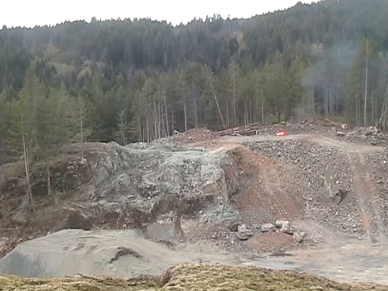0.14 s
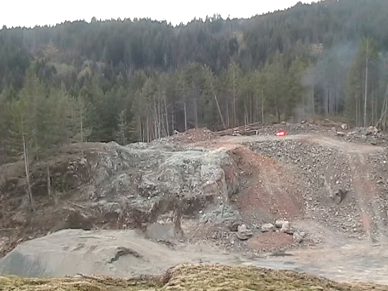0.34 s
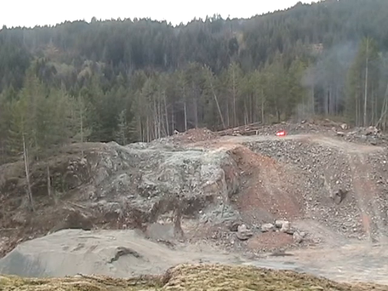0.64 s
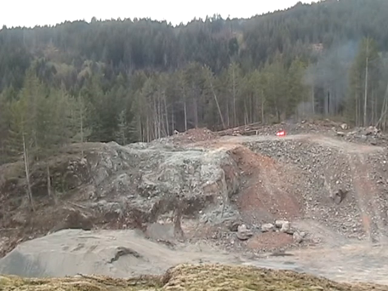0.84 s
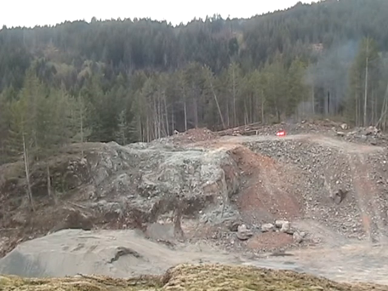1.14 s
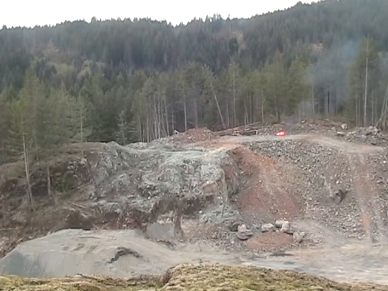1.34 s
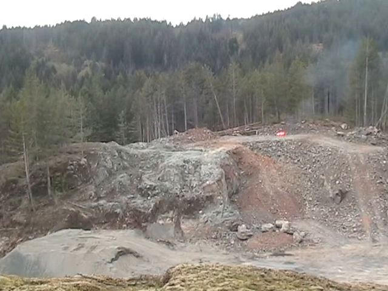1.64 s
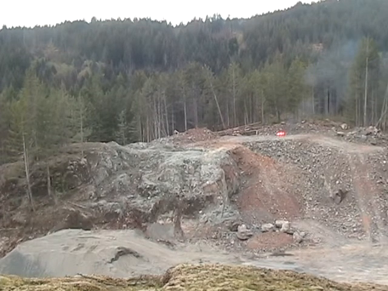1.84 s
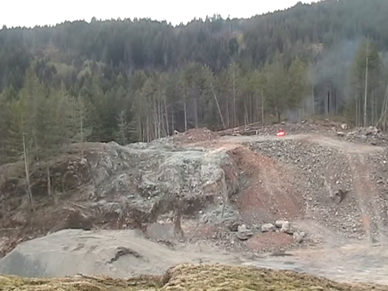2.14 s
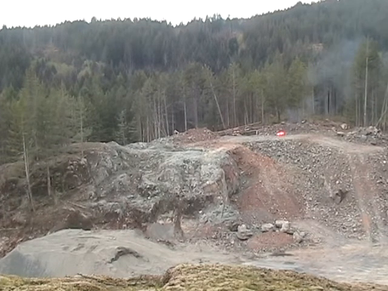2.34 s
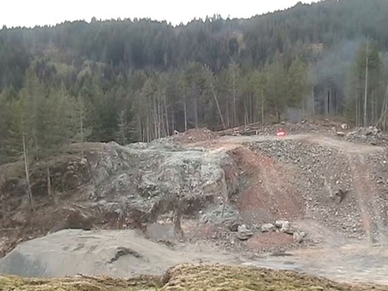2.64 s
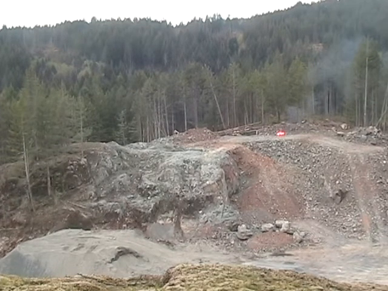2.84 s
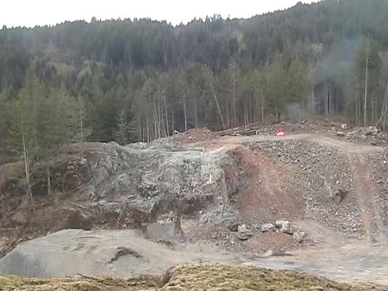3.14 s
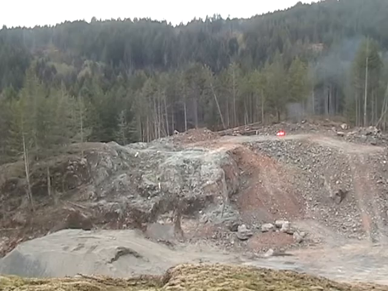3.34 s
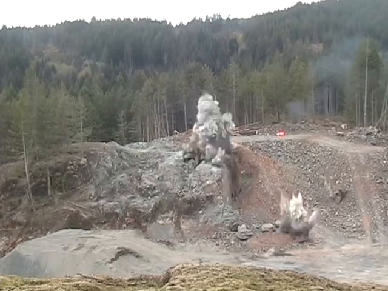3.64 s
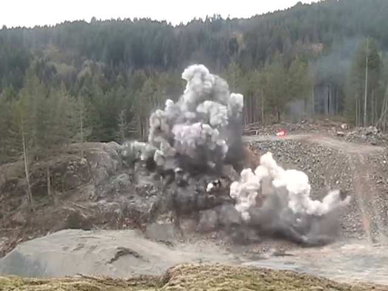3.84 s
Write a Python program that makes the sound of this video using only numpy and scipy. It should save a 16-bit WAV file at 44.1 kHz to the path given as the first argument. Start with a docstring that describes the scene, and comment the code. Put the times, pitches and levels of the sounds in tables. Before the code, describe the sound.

A quarry blast breaks a quiet outdoor scene. From 0 to 3.28 s there is soft air and hiss, faint camcorder motor whine, a far engine's low wavering drone and a thin high whistle coming and going until about 2.95 s. Tiny snaps lead into deep, clipped thuds at 3.29 s; dense sharp charges crackle from 3.4 s, with choking pressure surges from 3.9 s, cutting off at 4 s.

```python
"""A few deep thuds overload the recorder, sharp charges crackle on and slow pressure surges follow: a quarry
face blasted across a wooded valley. Underneath, a far engine drones and rumbles, air and electronics hiss,
camcorder motors whine and a thin whistle comes and goes. Thuds are dying sines over filtered noise, charges are
clicks in noise bursts, surges are a slow curve into the capsule stops; the engine is a drifting sine and a
broad low noise band, the motors are spectral lines and narrower noise bands."""
import sys
import numpy as np
from scipy import signal
from scipy.fft import rfft, irfft
from scipy.io import wavfile
from scipy.ndimage import uniform_filter1d, map_coordinates

SR = 44100
rng = np.random.default_rng(int(sys.argv[2]) if len(sys.argv) > 2 else 0)


def wav_record(signal):
    """Record a signal, one row per channel, as 16-bit PCM in the file named by sys.argv[1]."""
    frames = np.transpose(np.atleast_2d(signal))
    bounded = np.clip(frames, -1, 1)
    # unit amplitude maps onto the largest positive 16-bit level
    quanta = np.round(bounded * 32767).astype(np.int16)
    wavfile.write(sys.argv[1], SR, quanta)


def nominal_scale(level):
    """Amplitude ratio for a level in decibels (scalar or array-like)."""
    x = np.asarray(level, float) / 20
    return 10 ** x


N = 176400
T = np.arange(N) / SR
CAPSULE_STOP_DB = 5

# slow pressure on the capsules: t/s, share of their stop
PRESSURE = [(3.87, 0), (3.8965, .6), (3.9, 1.4), (3.903, 1.3), (3.904, .6), (3.9455, .95), (3.957, .8),
            (3.9588, 1.4), (3.9615, 1.4), (3.9625, .7), (3.978, 1.1), (3.981, .7), (3.991, .75),
            (3.9925, 1.5), (3.9975, 1.5), (3.9985, .8)]


def read(table, hz):
    """dB of a (f/Hz, level/dB) table, interpolated on a log frequency axis."""
    rows = np.array(table, float)
    return np.interp(np.log(hz + 1), np.log(rows[:, 0]), rows[:, 1])


def colour(x, table):
    """Minimum-phase filter of unit power with the table's shape, by folding the cepstrum."""
    log_gain = read(table, np.linspace(0, SR / 2, 4097)) * np.log(10) / 20
    cepstrum = irfft(log_gain)
    cepstrum[1:4096] *= 2
    cepstrum[4097:] = 0
    h = irfft(np.exp(rfft(cepstrum)))[:4096]
    return signal.fftconvolve(x, h / np.sqrt(np.sum(h ** 2)))[:N]


def noise():
    """White noise of unit power."""
    return rng.standard_normal(N)


def clicks(times_s, sizes):
    """A train of single-sample pulses."""
    at = np.clip((np.asarray(times_s) * SR).astype(int), 0, N - 1)
    return np.bincount(at, sizes, N)


def tail(train, tau_s):
    """Envelope that jumps at each pulse and dies away; powers add."""
    power = signal.lfilter([1], [1, -np.exp(-2 / (tau_s * SR))], train ** 2)
    return np.sqrt(np.maximum(power, 0))


def rings(rows):
    """A dying sine for each row, computed over the last second only."""
    start_s, db, hz, swing, t60_s = np.array(rows).T[:, :, None]
    age_s = np.maximum(T[-SR:] - start_s, 0)
    decay = np.exp(-np.log(1000) * age_s / t60_s)
    sines = swing * nominal_scale(db) * np.sin(2 * np.pi * hz * age_s) * decay
    return np.r_[np.zeros(N - SR), sines.sum(axis=0)]


def thuds():
    """Dying low swings, with noise rumble after them and under the surges; mid and side."""
    # deep thuds: t/s, level/dB, ring f/Hz, signed first-swing factor, t60/s
    thud_rows = [(3.2872, 15.5, 268.7, -0.67, 0.059), (3.2971, 6.5, 545, 0.93, 0.035),
                 (3.3052, -1.5, 300, 1, 0.017), (3.3202, 4, 215, 1, 0.019), (3.359, 1, 295, 1, 0.0097),
                 (3.3728, 2.5, 314, -1.4, 0.028), (3.4, -1.5, 257, -1.07, 0.058),
                 (3.9323, -1, 320, 0.0047, 0.013), (3.9711, -5.5, 300, 0.67, 0.012)]
    # rumble spectrum: f/Hz, relative density/dB
    rumble_shape = [(30, 1), (120, -2.5), (260, -1), (500, -4.5), (5100, -28.5), (14000, -48.5)]
    tail_s, tail_db, surge_rumble_db, side_db = 0.016, -9, -16, -10.5
    start_s, db = np.array(thud_rows).T[:2]
    env = tail(clicks(start_s, nominal_scale(db + tail_db)), tail_s)
    env = env + nominal_scale(surge_rumble_db) * np.interp(T, *np.array(PRESSURE).T)
    rumble = colour(noise() * env, rumble_shape)
    wide = colour(noise() * env, rumble_shape)
    return rings(thud_rows) + rumble, nominal_scale(side_db) * wide


def snaps():
    """Faint band-passed pulses ahead of the thuds; mid only."""
    # first faint snaps: t/s, level/dB before the band-pass and its make-up gain
    snap_rows = [(3.2788, -16), (3.2844, -10.5)]
    centre_hz, makeup = 3730, -3
    start_s, db = np.array(snap_rows).T
    band = signal.butter(1, [centre_hz / 3, centre_hz * 2], "band", fs=SR, output="sos")
    return signal.sosfilt(band, clicks(start_s, makeup * nominal_scale(db)))


def crackle():
    """Each charge is a click inside a short noise burst with a fainter slope echo; mid and side."""
    # sharp charges: t/s, relative level/dB
    crack_rows = [(3.3726, 13), (3.419, 4.5), (3.4232, 15.5), (3.4261, 8), (3.4375, 12), (3.445, 7),
                  (3.457, 7.5), (3.4651, -3.5), (3.471, 14.5), (3.491, 8), (3.5012, 6), (3.5106, 11),
                  (3.5188, 6), (3.529, 5.5), (3.5463, 12), (3.5548, 7.5), (3.5657, 5.5), (3.5762, 8.5),
                  (3.5826, 8), (3.5976, 6), (3.6145, 9), (3.625, 6), (3.635, 0), (3.644, 11), (3.6607, 8.5),
                  (3.6706, 6), (3.6812, 7.5), (3.7016, 5), (3.7116, 3.5), (3.7183, 1.5), (3.73, 3),
                  (3.736, 7), (3.7494, 0.5), (3.7615, 9.5), (3.7741, 6.5), (3.7891, 4), (3.7945, 7),
                  (3.8044, 9.5), (3.8103, 7), (3.8235, 4.5), (3.83, 3), (3.8417, 8.5), (3.8624, 11),
                  (3.8836, 4), (3.897, 13), (3.917, 3.5), (3.9868, 3)]
    # smaller cracks between them: t/s, relative level/dB before scatter
    patter_rows = [(3.288, -12), (3.41, -14.5), (3.44, -13.5), (3.86, -10), (3.9, -18), (4.0, -14)]
    # mid spectrum: f/Hz, relative density/dB
    mid_shape = [(30, -20), (195, -14), (384, -9), (900, -1.5), (1350, -3), (2000, -9.5), (3500, -14.5),
                 (8920, -33), (15000, -52)]
    # side spectrum: f/Hz, relative density/dB
    side_shape = [(30, 9), (222, 1), (1000, 3), (5440, -10.5), (15000, -57)]
    mid_db, side_db, click_db = -12.5, -29.5, 5.5
    burst_s, rise_s = 0.0019, 0.001
    echo_s, echo_db = 0.03, -17.5  # the slopes fill the gaps between cracks
    patter_spread_db = 16  # full width of the uniform scatter

    place, scatter, sign = rng.random((1400, 3)).T
    when_s = patter_rows[0][0] + place * (T[-1] - patter_rows[0][0])
    size_db = np.interp(when_s, *np.array(patter_rows).T) + patter_spread_db * (scatter - .5)
    start_s, db = np.array(crack_rows).T
    train = clicks(start_s, -nominal_scale(db)) + clicks(when_s, nominal_scale(size_db) * np.sign(sign - .5))

    burst = uniform_filter1d(tail(train, burst_s), int(rise_s * SR) + 1)
    env = np.hypot(burst, nominal_scale(echo_db) * tail(train, echo_s))
    mid = colour(nominal_scale(click_db) * train + env * noise(), mid_shape)
    side = colour(env * noise(), side_shape)
    return nominal_scale(mid_db) * mid, nominal_scale(side_db) * side


def jolts():
    """Dying low swings, opposite in the two channels; side only."""
    # jolts: t/s, level/dB, ring f/Hz, signed first-swing factor, t60/s
    jolt_rows = [(3.2877, 12, 121.4, 0.23, 0.029), (3.8935, -2.5, 160, -1.6, 0.01),
                 (3.9042, 8, 85, -1.1, 0.02), (3.9315, 3, 150, -1.2, 0.045), (3.938, -11, 68, -1.1, 0.12),
                 (3.9905, 1, 149, 0.92, 0.017)]
    return rings(jolt_rows)


def surges():
    """A slow heave of pressure, a little uneven between the capsules; left and right."""
    smooth_s, pan_db = 0.00039, 0.1
    heave = uniform_filter1d(np.interp(T, *np.array(PRESSURE).T), int(smooth_s * SR) + 1)
    return nominal_scale(CAPSULE_STOP_DB + np.array([[pan_db], [-pan_db]]) / 2) * heave


def head_drum():
    """Harmonics of the camcorder's head drum, with sidebands in the treble; mid and side."""
    # drum tone and its sidebands: offset f/Hz, relative level/dB
    line_sets = [(0, 0), (-70, -3), (70, -6), (-15, -6), (41, -6)]
    # mid harmonics: f/Hz, level/dB before scatter
    mid_levels = [(150, -72), (300, -73), (1500, -88.5), (5500, -93.5), (11000, -98), (12000, -105)]
    # side harmonics: f/Hz, level/dB before scatter
    side_levels = [(150, -70), (1500, -86), (5500, -91.5), (7200, -94), (11000, -87), (12000, -103)]
    drum_hz, scatter_db, sidebands_from_hz = 149.85, 4.5, 2200
    out = []
    for table in (mid_levels, side_levels):
        lines = np.zeros(N // 2 + 1, complex)
        for offset_hz, db in line_sets:
            hz = drum_hz * np.arange(1, 81) + offset_hz
            treble = hz > sidebands_from_hz
            level_db = read(table, hz) + db + scatter_db * rng.standard_normal(80) * treble
            size = nominal_scale(level_db) * ((offset_hz == 0) | treble)
            phase = np.exp(2j * np.pi * rng.random(80))
            lines[np.round(hz * N / SR).astype(int)] += size * phase * N / np.sqrt(2)
        out.append(irfft(lines, N))
    return np.array(out)


def rumble_and_whines():
    """A broad low engine rumble near 78 Hz, narrower motor whines and steady tones; mid and side."""
    # noise band centres, engine rumble first, then whines: f/Hz
    centres_hz = [78, 168, 583, 992, 1150, 3500]
    # one row per band: width/Hz, mid level/dB, side level/dB
    band_rows = [(56.7, -59, -64), (15, -71, -67), (5.4, -76, -68.5), (16.3, -70, -63), (40.6, -75.5, -67),
                 (30, -82.5, -90)]
    # steady tones: f/Hz, mid level/dB, side level/dB
    tone_rows = [(4985, -81, -76), (5893, -78, -79), (6357, -83, -76)]
    bins_hz = np.fft.rfftfreq(N, 1 / SR)
    out = []
    for column in (1, 2):
        density = np.zeros(len(bins_hz))
        for hz, row in zip(centres_hz, band_rows):
            width_hz = row[0]
            density += nominal_scale(row[column]) ** 2 / width_hz / (1 + (2 * (bins_hz - hz) / width_hz) ** 4)
        spectrum = rfft(noise()) * np.sqrt(density * SR / 2)
        for row in tone_rows:
            spectrum[int(row[0] * N / SR)] += nominal_scale(row[column]) * N / np.sqrt(2)
        out.append(irfft(spectrum, N))
    return np.array(out)


def whistle():
    """A wavering thin sine in gated spells, its pitch sagging through each; both channels alike."""
    # spells: start t/s, end t/s
    spells = [(.44, 0.74), (.86, 1.4), (1.5, 1.9), (2.3, 2.64), (2.801, 2.95)]
    start_hz, sag_hz, level_db, waver_db = 1670, 35.06, -73, 2
    start_s, end_s = np.array(spells).T[:, :, None]
    along = (T - start_s) / (end_s - start_s)
    on = (along > 0) & (along < 1)
    waver = np.interp(T, np.linspace(0, T[-1], 120), rng.standard_normal(120))
    hz = start_hz + sag_hz * (0.295 * waver - (on * along).sum(axis=0))
    gate = uniform_filter1d(on.sum(axis=0) * 1., SR // 20)
    level = np.sqrt(2) * nominal_scale(level_db + waver_db * waver[::-1])
    return level * gate * np.sin(2 * np.pi * np.cumsum(hz) / SR)


def engine():
    """A far engine's drone: one sine drifting in pitch and level, in quadrature in mid and side."""
    # drone: t/s, f/Hz, mid level/dB before waver
    engine_rows = [(0, 76.1, -72), (.5, 72.6, -49.5), (.85, 73.3, -45), (1.18, 71.5, -48.5),
                   (1.38, 70.1, -68), (1.7, 71.3, -55.5), (2.15, 69.4, -55), (2.32, 66.4, -49.5),
                   (2.6, 68.1, -61.5), (2.949, 64.3, -50)]
    side_db, waver_db = -13, 3
    s, hz, db = np.array(engine_rows).T
    phase = 2 * np.pi * np.cumsum(np.interp(T, s, hz)) / SR
    waver = waver_db * np.interp(T, np.linspace(0, T[-1], 40), rng.standard_normal(40))
    level = np.sqrt(2) * nominal_scale(np.interp(T, s, db) + waver)
    return level * np.array([np.sin(phase), nominal_scale(side_db) * np.cos(phase)])


def air_and_hiss():
    """Soft air and electronic hiss as steady filtered noise; mid and side."""
    # mid spectrum: f/Hz, relative density/dB
    mid_shape = [(25, 15.5), (81, -5), (709, -6), (1000, -7.5), (1280, -16.5), (1630, -12), (3930, -25),
                 (6200, -19.5), (7280, -42), (15000, -53)]
    # side spectrum: f/Hz, relative density/dB
    side_shape = [(25, 1.5), (139, 4), (903, -9.5), (1150, -8.5), (1700, -11.5), (2430, -41), (6370, -17.5),
                  (7280, -35), (10900, -26), (15000, -45)]
    mid_db, side_db = -54, -54
    return np.array([nominal_scale(mid_db) * colour(noise(), mid_shape), nominal_scale(side_db) * colour(noise(), side_shape)])


def scene():
    """Mixes to left and right; the blast's mid reaches the right capsule slightly first."""
    left_lag_s = 3.2e-5
    crack_mid, crack_side = crackle()
    thud_mid, thud_side = thuds()
    blast = crack_mid + thud_mid + snaps()
    late = map_coordinates(blast, [(T - left_lag_s) * SR], mode="nearest")
    quiet_mid, quiet_side = head_drum() + rumble_and_whines() + engine() + air_and_hiss()
    side = crack_side + thud_side + quiet_side + jolts()
    stereo = np.array([late + quiet_mid + side, blast + quiet_mid - side])
    return stereo + surges() + whistle()


def low_pass(x):
    """Removes everything above the highest recorded frequency."""
    return signal.sosfilt(signal.butter(12, 15660, fs=SR, output="sos"), x)


def low_cut(x, hz):
    """Second-order high-pass."""
    return signal.sosfilt(signal.butter(2, hz, "high", fs=SR, output="sos"), x)


def record(dry):
    """Capsules hit their stops, the low cut trims the mid more than the side, the converter clips."""
    mid_cut_hz, side_cut_hz, ceiling = 125, 38, .97
    stop = nominal_scale(CAPSULE_STOP_DB)
    left, right = np.clip(dry, -stop, stop)
    mid = low_cut(left + right, mid_cut_hz) / 2
    side = low_cut(left - right, side_cut_hz) / 2
    mix = np.clip([mid + side, mid - side], -ceiling, ceiling)
    return low_pass(mix)


dry = scene()
out = record(dry)
wav_record(out)
```